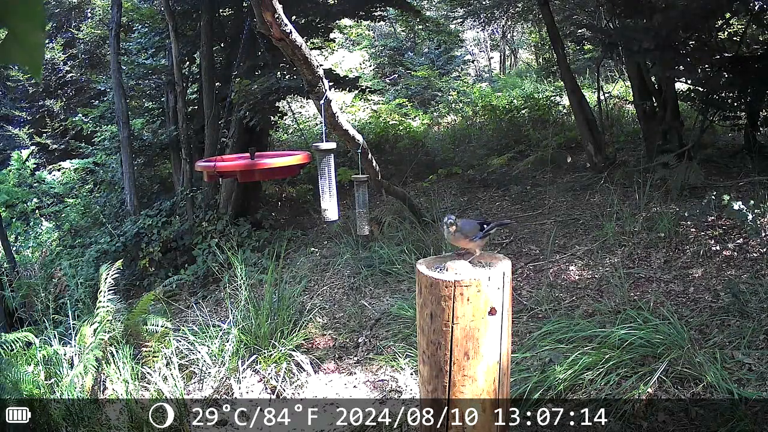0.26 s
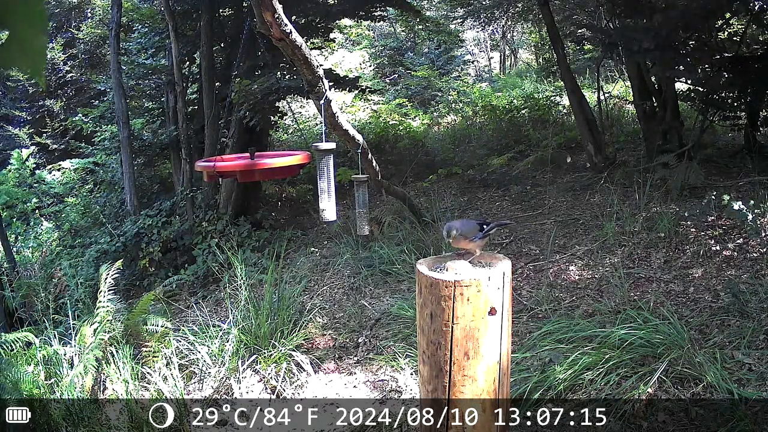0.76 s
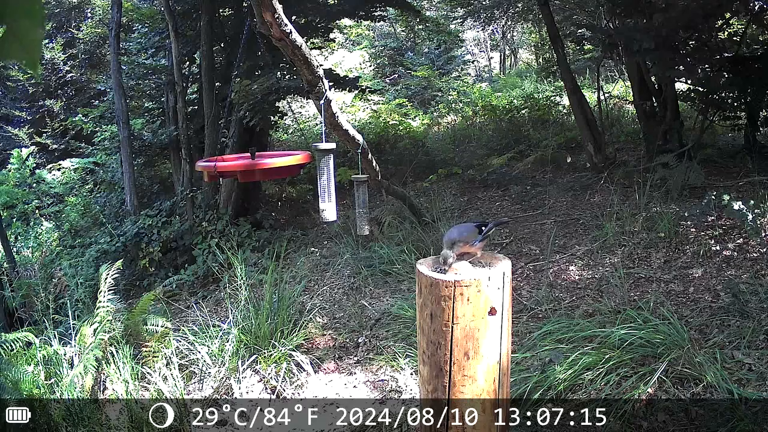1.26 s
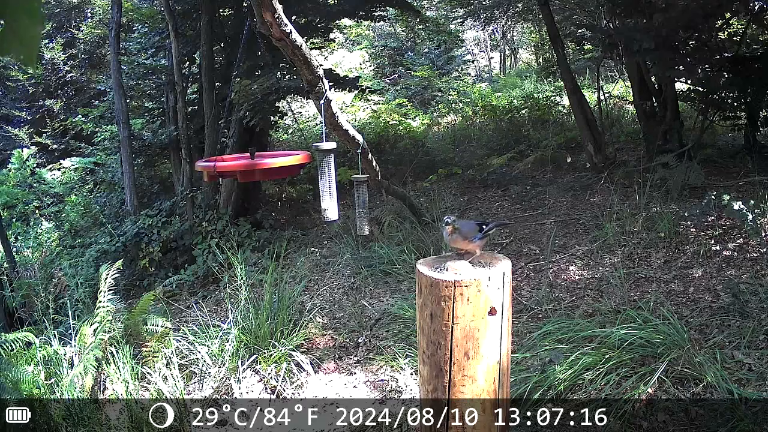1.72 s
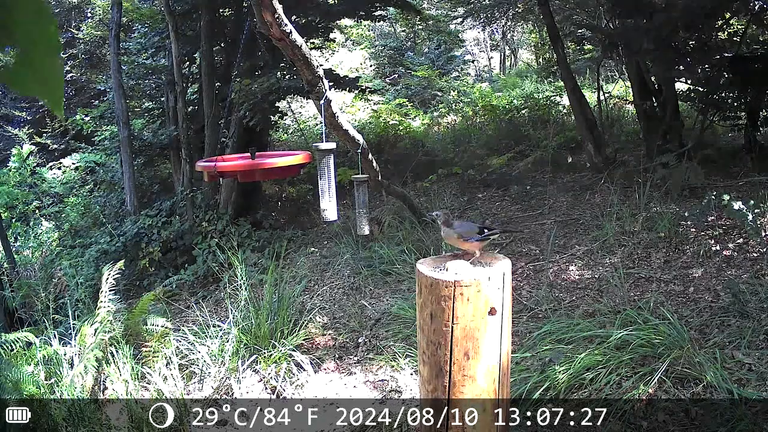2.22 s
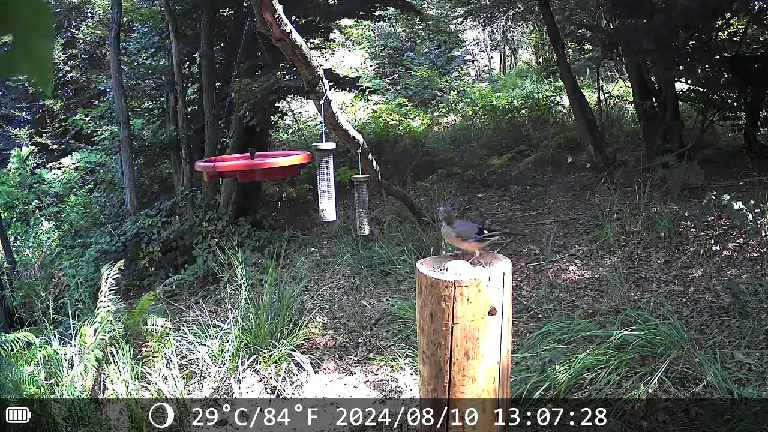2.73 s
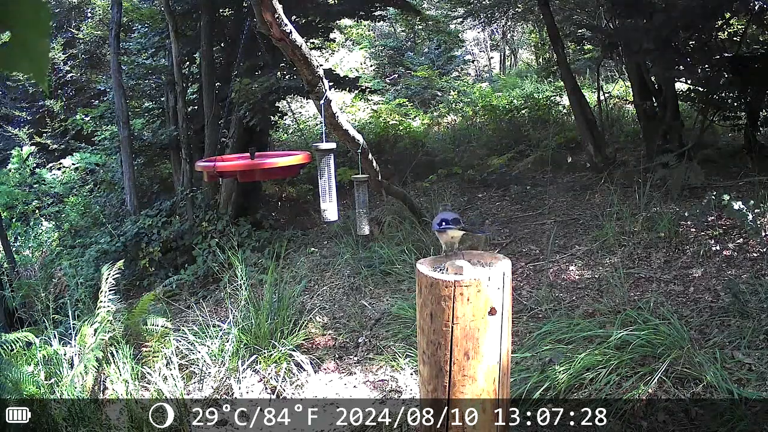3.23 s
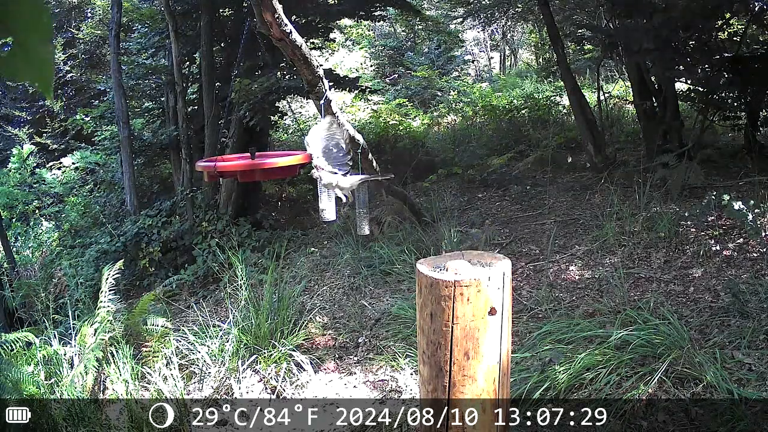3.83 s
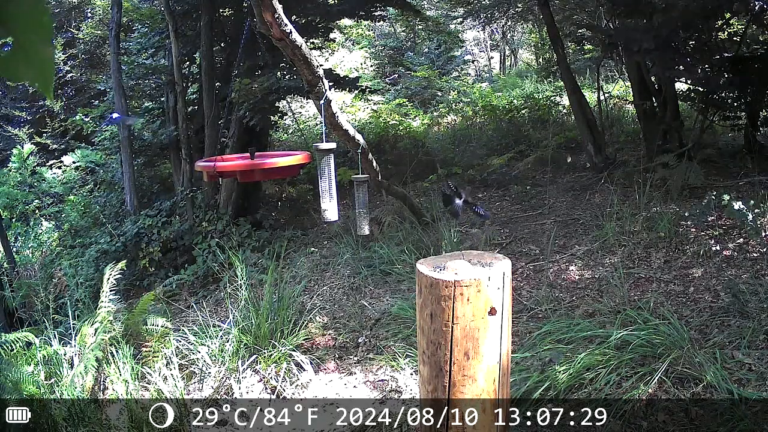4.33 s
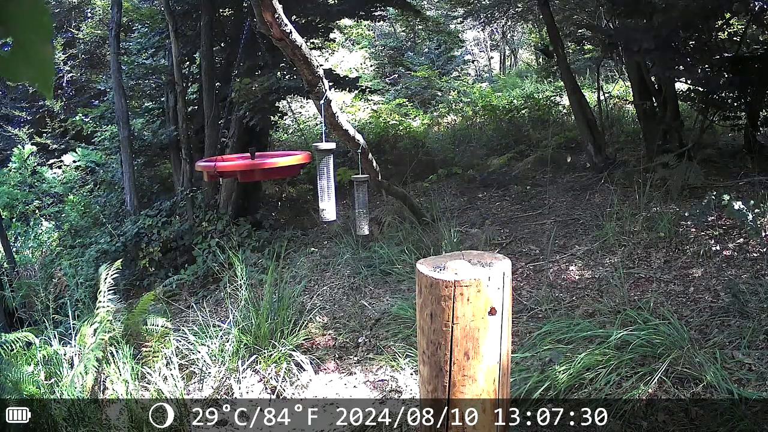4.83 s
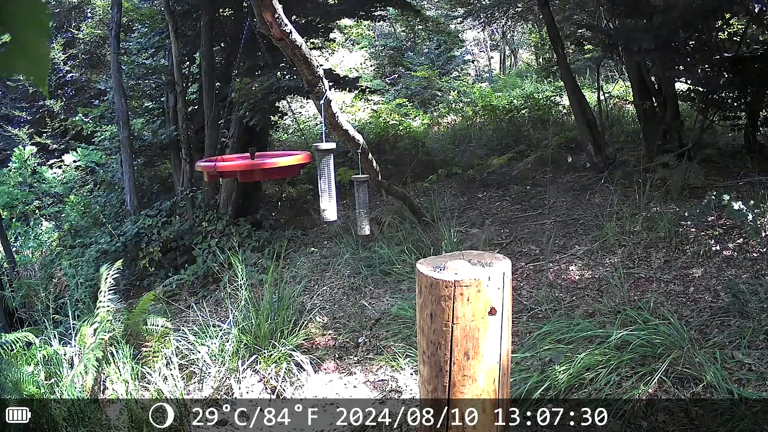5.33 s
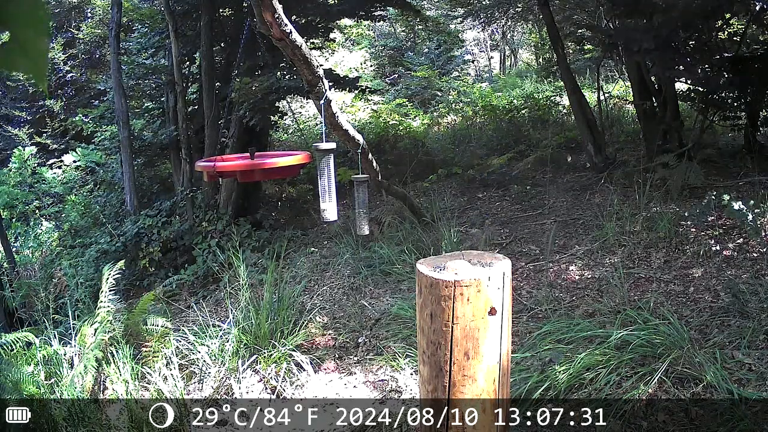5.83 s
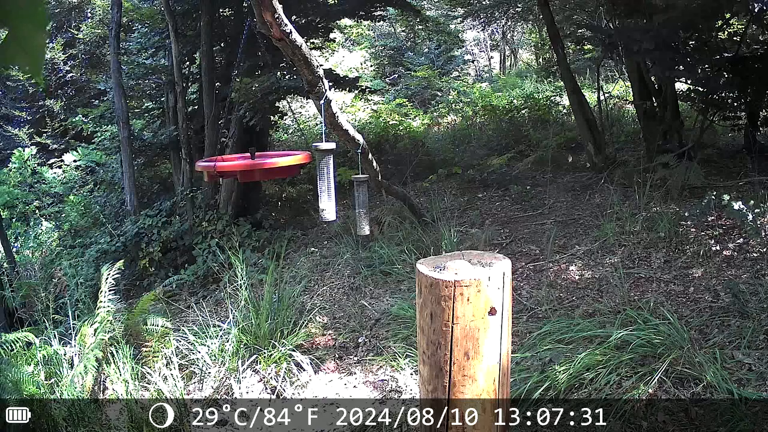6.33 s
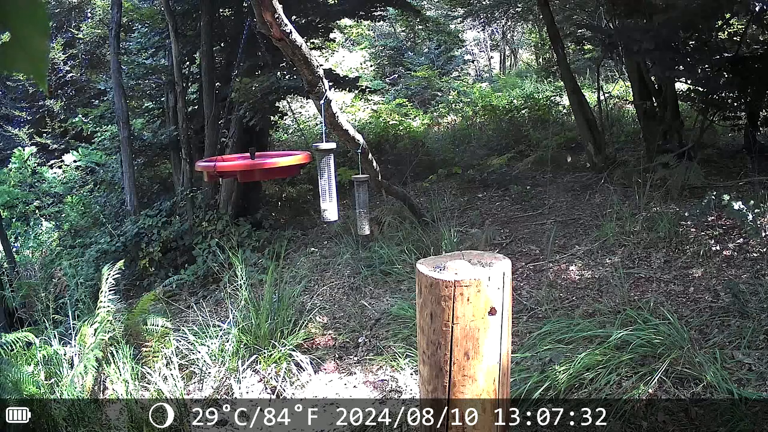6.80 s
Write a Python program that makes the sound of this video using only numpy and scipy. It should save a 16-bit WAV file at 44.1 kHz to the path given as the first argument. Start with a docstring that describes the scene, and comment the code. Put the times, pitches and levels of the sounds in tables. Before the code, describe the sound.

Fast insect pulses and a distant insect chorus run throughout, with quiet moving air and leaves. After a very thin chirp and a small grainy rustle with ticks, a jay close to the fixed microphone gives coarse, noisy screams; low fluttering wingbeats overlap them. One trill stops soon after, leaving a thinner insect bed, a last separate screech, and soft echoing whistles from a small bird deep in the wood.

```python
"""Jay in a summer wood

A jay screeches five times, chopped noisy partials from a chaotic syrinx, then flaps off: thumps and puffs.
Crickets and bush crickets repeat pulsed tones, two in bouts; gliding sines make bird whistles and a thin chirp.
Shaped noise makes the far insects, leaves, moving air, rumble and microphone hiss."""
import sys
import numpy as np
from scipy import signal
from scipy.fft import rfft, irfft, next_fast_len
from scipy.io import wavfile
from scipy.ndimage import uniform_filter1d, map_coordinates

SR = 44100
rng = np.random.default_rng(int(sys.argv[2]) if len(sys.argv) > 2 else 0)


def pcm_store(signal):
    """Save signal as 16-bit PCM."""
    levels = np.round(np.clip(np.atleast_2d(signal), -1, 1) * 32767)
    wavfile.write(sys.argv[1], SR, levels.astype(np.int16).T)


N = 311346


def amp(db):
    """Amplitude ratio of a level in dB."""
    return 10 ** (np.asarray(db) / 20)


def unit(x):
    """x scaled to rms 1."""
    return x / np.sqrt(np.mean(x ** 2) + 1e-20)


def curves(rows):
    """Per-sample line through each column after the time column."""
    s, *cols = np.transpose(rows)
    return [np.interp(np.arange(N) / SR, s, c) for c in cols]


def wobble(knots_per_s):
    """Smooth random curve through normal knots."""
    knots = rng.standard_normal(int(N * knots_per_s / SR) + 4)
    return map_coordinates(knots, [np.arange(N) * knots_per_s / SR])


def filtered(x, response):
    """x times a response of frequency in Hz."""
    m = next_fast_len(N + SR)
    spectrum = rfft(x, m) * response(np.fft.rfftfreq(m, 1 / SR))
    return irfft(spectrum, m)[..., :N]


def coloured(x, points):
    """x through (freq_hz, gain_db) points joined on a log frequency axis."""
    f, db = np.transpose(points)
    return filtered(x, lambda hz: amp(np.interp(np.log(hz + 1), np.log(f + 1), db)))


def rush(spectrum, side_db, patchy_db):
    """Stereo noise of rms 1; smoothed random gains make time-frequency patches."""
    z = signal.stft(rng.standard_normal((2, N)), nperseg=512)[2]
    field = uniform_filter1d(rng.standard_normal(z.shape[1:]), 6, 0)
    field = uniform_filter1d(field, 10, 1)
    patchy = signal.istft(z * amp(patchy_db * unit(field)), nperseg=512)[1][:, :N]
    mid, side = coloured(patchy, spectrum)
    side = amp(side_db) * side
    return unit(np.array([mid + side, mid - side]))


def wood(x, t60, wet_db, channels):
    """Direct sound plus the trunks' scattered answer: decaying noise."""
    t = np.arange(SR) / SR
    tail = rng.standard_normal((channels, SR)) * amp(-60 * t / t60) * (t > .004)
    wet = signal.fftconvolve(x[None], tail / np.linalg.norm(tail[0]), axes=1)[:, :N]
    return x + amp(wet_db) * wet


def tone(hz):
    """Sine of rms 1 that follows hz."""
    return np.sqrt(2) * np.sin(2 * np.pi * np.cumsum(hz) / SR)


def bouts(spans, fade_s):
    """Gain 1 inside the spans, 0 outside, with linear fades."""
    t = np.arange(N) / SR
    return sum(np.clip(np.minimum(t - a, b - t) / fade_s + .5, 0, 1) for a, b in spans)


# beak and throat response: freq_hz, gain_db
BEAK_RESPONSE = [(900, -18), (1200, 1.5), (2000, 1), (4500, 1.5), (5300, 1), (6200, -2.5), (7500, -39)]
# vocal effort, one list per call: time_s, level_db
CALL_EFFORT = [
    [(3.48, -54), (3.502, -54), (3.548, -39), (3.806, -29.5), (3.822, -41), (3.9, -47.5)],
    [(3.9, -46.5), (3.984, -33.5), (4.0, -36.5), (4.032, -34), (4.112, -34), (4.2, -62)],
    [(4.23, -59), (4.274, -43.5), (4.316, -38.5), (4.416, -37.5), (4.462, -33.5), (4.56, -69)],
    [(4.62, -64), (4.668, -43.5), (4.702, -40), (4.832, -41.5), (4.94, -67)],
    [(5.31, -69), (5.352, -48.5), (5.424, -40), (5.44, -45.5), (5.534, -42), (5.552, -39.5), (5.66, -68.5)],
]
# call partials, one row per call; levels over effort: low_hz, main_start_hz, main_end_hz, upper_start_hz,
# upper_settled_hz, low_db, gape_db, bridge_db, upper_db, line_clearness (1 = usual)
CALL_VOICES = [(1462, 3040, 3080, 4600, 4080, -21, -21, -7, -3.5, 0.58),
               (1544, 2900, 3060, 4300, 4050, -18, -24, -12, -4.5, 0.54),
               (1518, 2850, 2950, 4280, 4180, -18.5, -23.5, -6.5, -1, 0.54),
               (1453, 2760, 3140, 4080, 4270, -14, -21, -12.5, -4, 1.54),
               (1379, 2990, 3200, 4040, 4180, -16, -20.5, -10.5, -1, 0.86)]
# noise width of each band, low to top: width_hz
BAND_WIDTHS = [200, 290, 513, 422, 377, 460, 320, 1000]
OPENS_BEFORE_END_S, OPENS_IN_S = 0.18, 0.12  # beak opens wider near the end
CLOSES_IN_S, OPEN_AT_START_SHARE = .06, 0.6  # beak starts part open
UNDER_OPENS_DB, GAPE_OPENS_DB, BRIDGE_OPENS_DB, UPPER_OPENS_DB = 15.5, 11.5, 3.5, 2
LOW_QUITS_S, LOW_QUITS_DB = 0.11, -28.5  # low partial dies first
LOW_LAG_DB_PER_DB = 0.17  # low partial follows effort less
LOW_BEND_SHARE, LOW_BEND_KNOTS_PER_S = .03, 12
SPRAY_DB, SPRAY_DB_PER_DB, LOUD_DB = -11.5, 0.63, -27.5  # top band follows effort more, around LOUD_DB
UNDER_DB, OVER_DB = -18, -9.5  # faint partials, relative to low and upper
UPPER_SETTLES_S = .11  # upper partial's glide
WANDER_DB, WANDER_KNOTS_PER_S = 2.3, 35  # independent level of each band


def jay():
    """Chaotic syrinx: wavering partials share one slower rasp; beak opening lifts some."""
    t, rows = np.arange(N) / SR, []
    on, rasp_hz, opening, quitting = np.zeros((4, N))
    for call, voice in zip(CALL_EFFORT, CALL_VOICES):
        low, main_a, main_b, upper_a, upper_b, *rest = voice
        start, end = call[0][0], call[-1][0]
        inside = (t > start) * (t <= end)
        on += np.clip(np.minimum(t - start, end - t) / 0.025, 0, 1)
        rasp_hz += inside * np.interp(t, [start, end], [192, 160])
        opening += inside * np.clip((t - end + OPENS_BEFORE_END_S) / OPENS_IN_S, 0, 1)
        opening += inside * OPEN_AT_START_SHARE * np.clip(1 - (t - start) / CLOSES_IN_S, 0, 1)
        quitting += inside * np.clip(1 - (end - t) / LOW_QUITS_S, 0, 1)
        main_settled = main_a + (main_b - main_a) * UPPER_SETTLES_S / (end - start)
        rows += [(start, low, main_a, upper_a, *rest),
                 (start + UPPER_SETTLES_S, low, main_settled, upper_b, *rest),
                 (end - 1 / SR, low, main_b, upper_b, *rest)]
    effort_db = curves(np.concatenate(CALL_EFFORT))[0]
    low, main, upper, low_db, gape_db, bridge_db, upper_db, clearness = curves(rows)
    low = low * (1 + LOW_BEND_SHARE * wobble(LOW_BEND_KNOTS_PER_S))
    # bands: under, low, gape, main, bridge, upper, over, spray
    centres = [low - 380, low, (low + main) / 2, main, (main + upper) / 2, upper, upper + 700, upper + 1100]
    clear = np.outer([.4, .55, .45, .4, .3, .4, .3, .05], np.clip(clearness, 0, 1.7))
    low_db += LOW_QUITS_DB * quitting - LOW_LAG_DB_PER_DB * (effort_db - effort_db.max())
    levels_db = [low_db + UNDER_DB + UNDER_OPENS_DB * opening,
                 low_db,
                 gape_db + GAPE_OPENS_DB * opening,
                 -4.5,
                 bridge_db + BRIDGE_OPENS_DB * opening,
                 upper_db + UPPER_OPENS_DB * opening,
                 upper_db + OVER_DB,
                 SPRAY_DB + SPRAY_DB_PER_DB * (effort_db - LOUD_DB)]
    source = np.zeros(N)
    for hz, width_hz, line_share, db in zip(centres, BAND_WIDTHS, clear, levels_db):
        gain = amp(db + WANDER_DB * wobble(WANDER_KNOTS_PER_S))
        source += gain * flutter(hz, width_hz, line_share)
    # uneven pace; every second burst weaker
    beat = 2 * np.pi * np.cumsum(rasp_hz * (1 + 0.0777 * wobble(60))) / SR
    chop = unit(amp(3.3 * np.cos(beat) + .8 * np.cos(beat / 2) + .9 * wobble(160)))
    voice = on * amp(effort_db) * chop * source
    return wood(coloured(voice, BEAK_RESPONSE), t60=0.28, wet_db=-6, channels=1)


def flutter(hz, width_hz, clear):
    """Partial that follows hz: a wavering line inside a cloud of noise."""
    noise = filtered(rng.standard_normal((2, N)), lambda f: np.exp(-(f / width_hz) ** 2))
    wavering_hz = hz * (1 + .015 * wobble(55) + .013 * wobble(14))  # quick waver, slow drift
    turn = 2 * np.pi * np.cumsum(wavering_hz) / SR
    cloud = unit(noise[0] * np.cos(turn) + noise[1] * np.sin(turn))
    return np.sqrt(2 * clear) * np.cos(turn) + np.sqrt(1 - clear) * cloud


# wing downstrokes: start_s, thump_db, thump_hz, puff_db
WING_STROKES = [(3.95, -56, 425, -56.5), (3.98, -45, 467, -41), (4.076, -49, 427, -52.5),
                (4.123, -57, 708, -58), (4.165, -46.5, 444, -54), (4.254, -58.5, 357, -59),
                (4.342, -58, 414, -61.5), (4.432, -63, 607, -63)]
# puff noise colour: freq_hz, gain_db
PUFF_SPECTRUM = [(120, -16), (250, -1), (450, 0), (700, -2.5), (1200, -12), (3000, -9), (7000, -62.5)]
STROKE_RISE_S = 0.0067


def wings():
    """Each downstroke is a low thump and a puff of air with a feather-rustle tail."""
    puffs, thumps = np.zeros(N + SR), np.zeros(N + SR)
    t = np.arange(SR // 4) / SR
    swell = (t / STROKE_RISE_S * np.exp(1 - t / STROKE_RISE_S)) ** 2
    for s, db, hz, puff_db in WING_STROKES:
        span = slice(round(s * SR), round(s * SR) + len(t))
        puffs[span] += amp(puff_db) * (swell + 0.45 * np.exp(-t / 0.062))
        thumps[span] += amp(db) * swell * np.sin(2 * np.pi * hz * t)
    air = unit(coloured(rng.standard_normal(N), PUFF_SPECTRUM))
    return thumps[:N] + puffs[:N] * air


# thin near chirp: time_s, pitch_hz, level_db
NEAR_CHIRP = [(2.055, 7460, -74), (2.07, 7700, -63), (2.1, 8250, -61), (2.112, 8650, -60),
              (2.123, 8840, -62), (2.133, 8500, -59), (2.143, 8340, -63), (2.155, 7300, -58)]


def birds():
    """Small birds slightly left; the far whistler echoes longer."""
    far = wood(whistles(), t60=1.3, wet_db=-6.5, channels=2)
    chirp = sing(*curves(NEAR_CHIRP), NEAR_CHIRP[0][0], NEAR_CHIRP[-1][0])
    near = wood(chirp, t60=.25, wet_db=-18, channels=2)
    return amp([[1.2], [-1.2]]) * (far + near)


# far whistles: start_s, length_s, first_hz, last_hz, crest_share, crest_db
FAR_WHISTLES = [(5.464, 0.19, 2020, 2437, 1, -58.5), (5.706, 0.04, 1836, 2030, .6, -65.5),
                (5.852, 0.205, 1980, 2437, .48, -55.5)]
GLIDE_S, FADE_IN_DB, FADE_OUT_DB = .08, -19.5, -5.5  # edge levels relative to crest


def whistles():
    """Rising whistles that level off in pitch, swell, fade and stop short."""
    song, t = np.zeros(N), np.arange(N) / SR
    for s, length, first_hz, last_hz, crest, db in FAR_WHISTLES:
        age = np.clip(t - s, 0, length)
        rise = np.tanh(age / GLIDE_S) / np.tanh(length / GLIDE_S)
        level_db = db + np.interp(age / length, [0, crest, 1], [FADE_IN_DB, 0, FADE_OUT_DB])
        song += sing(first_hz + (last_hz - first_hz) * rise, level_db, s, s + length)
    return song


def sing(hz, db, start, end):
    """Gliding sine of unsteady level with soft edges."""
    t = np.arange(N) / SR
    edges = np.clip(np.minimum(t - start, end - t) / .006, 0, 1)
    return edges * amp(db + 2.5 * wobble(60)) * tone(uniform_filter1d(hz, size=300))


# insect strokes: cycle_share, pitch_hz, level_db
TICK_STROKE = [(0, 6760, -72.5), (.04, 6860, -59.5), (.12, 6870, -65.5), (.24, 6810, -71.5),
               (.32, 6620, -95.5), (.6, 6297, -100), (.68, 6773, -68.5), (.9, 6884, -70), (.95, 6816, -80)]
ARCH_STROKE = [(0, 5840, -68), (.05, 5680, -72), (.1, 5500, -73), (.15, 5380, -78), (.18, 5350, -95),
               (.78, 5680, -95), (.84, 5750, -73), (.92, 5860, -67)]
TRILL_STROKE = [(0, 7820, -73.5), (.12, 7720, -78), (.2, 7680, -82.5), (.72, 7660, -83.5), (.82, 7740, -78)]
LISP_STROKE = [(0, 12200, -83), (0.12, 12200, -107), (0.349, 12250, -97.5), (.45, 12250, -110),
               (.8, 12300, -110), (0.881, 12200, -93)]
# singing spans: start_s, end_s
TRILL_SPANS = [(-1, 4.19)]
LISP_SPANS = [(.83, 2.8), (4.68, 5.8)]
# faint steady buzz: freq_hz, relative_db_per_hz
BUZZ_SPECTRUM = [(2450, -50.5), (2620, -0.5), (2720, 3.5), (2850, -22.5), (3000, -46)]
# far insects: freq_hz, relative_db_per_hz
CHORUS_SPECTRUM = [(2060, -51.5), (3500, -25.5), (3940, -8.5), (4260, -10), (4540, -6), (4850, -4),
                   (5390, -12), (5660, -8), (6200, -3), (6700, -2), (7090, -10), (7240, -6.5),
                   (8100, -28.5), (10500, -57), (17800, -120)]


def insects():
    """Five near singers and a faint buzz over a far chorus that melts into hiss."""
    tick = singer(11.94, .79, TICK_STROKE, overtone_db=-41, vary_db=-1.0, blur=0.00302, wet_db=-9.0)
    arch = singer(11.78, .95, ARCH_STROKE, overtone_db=-22, vary_db=1.5, blur=.002, wet_db=-9)
    trill = singer(43.46, .15, TRILL_STROKE, overtone_db=-76.5, vary_db=-1.5, blur=0.0034, wet_db=-10.0)
    lisp = singer(12.18, 0, LISP_STROKE, overtone_db=-90, vary_db=2.5, blur=0.01, wet_db=-4.0)
    trill = bouts(TRILL_SPANS, fade_s=0.036) * trill
    lisp = bouts(LISP_SPANS, fade_s=.1) * lisp
    buzz = amp(-86.5) * rush(BUZZ_SPECTRUM, side_db=-6.5, patchy_db=4.5)
    chorus = amp(-64.5) * rush(CHORUS_SPECTRUM, side_db=-10.5, patchy_db=1.5)
    return tick + arch + trill + lisp + buzz + field_cricket() + chorus


def singer(strokes_per_s, first_share, stroke, overtone_db, vary_db, blur, wet_db):
    """An insect repeats one wing stroke; pitch and level vary randomly."""
    place = first_share + strokes_per_s * np.arange(N) / SR
    share, hz, db = np.transpose(stroke)
    hz = np.interp(place, share, hz, period=1) * (1 + blur * wobble(400))
    db = np.interp(place, share, db, period=1) + vary_db * wobble(30)
    song = amp(db) * (tone(hz) + amp(overtone_db) * tone(2 * hz))
    return wood(song, t60=0.33, wet_db=wet_db, channels=2)


# field cricket chirps: start_s, length_s
CRICKET_CHIRPS = [(-.05, 0.21), (0.537, 0.24), (1.72, 0.24), (2.294, 0.28), (2.886, 0.25), (4.15, 0.13),
                  (4.82, 0.14), (5.501, 0.21), (6.173, 0.27), (6.845, 0.26)]


def field_cricket():
    """Chirps of about 31 syllables per s, each bending upward in pitch."""
    t, level = np.arange(N) / SR, np.zeros(N)
    for s, length in CRICKET_CHIRPS:
        arc = np.sin(np.pi * np.clip((t - s) / length, 0, 1))
        level += amp(-65.5) * np.sqrt(np.abs(arc))
    syllable = (31 * t + 0.44 * wobble(5.3)) % 1
    hz = 4350 + 170 * syllable + 75 * wobble(250)
    pulse = 0.59 + 0.44 * np.sin(np.pi * syllable)
    song = level * pulse * amp(2.1 * wobble(120)) * tone(hz)
    return wood(song, t60=0.75, wet_db=-1.0, channels=2)


# background noise spectra: freq_hz, relative_db_per_hz
LEAF_SPECTRUM = [(290, -40.5), (500, -5.5), (1770, -11.5), (2080, -13.5), (2250, -15.5), (2380, -11.5),
                 (4200, -14.5), (5460, -46.5), (9240, -120)]
AIR_SPECTRUM = [(71, -28), (120, -1.5), (470, -8.5), (512, -15), (591, -9), (643, -14), (2670, -27),
                (3600, -33.5), (4680, -71.5), (7920, -120)]
RUMBLE_SPECTRUM = [(13, -41.5), (22, -9), (46, 2.5), (59, -1), (75, -13.5), (86, -1), (102, -6),
                   (150, -15.5), (200, -45.5), (330, -120)]
MIC_HISS_SPECTRUM = [(4650, -36), (7900, -6.5), (8360, -10.5), (9700, -6.5), (10600, -11.5), (11900, -6),
                     (15500, -15.5)]
LEAF_DB = -71
HUSH_FROM_S, HUSH_TO_S, HUSH_DB = 1.718, 2.436, -9.5  # leaf hiss drops abruptly, then returns


def background():
    """Shaped noise: leaves, moving air, far rumble and microphone hiss, plus a rustle."""
    leaf_db = LEAF_DB + HUSH_DB * bouts([(HUSH_FROM_S, HUSH_TO_S)], fade_s=.004)
    leaves = amp(leaf_db + 0.33 * wobble(27)) * rush(LEAF_SPECTRUM, side_db=-11, patchy_db=1.7)
    air = amp(-68.5) * rush(AIR_SPECTRUM, side_db=-4.5, patchy_db=-0.1)
    rumble = amp(-66 + 0.46 * wobble(7.6)) * rush(RUMBLE_SPECTRUM, side_db=-9.5, patchy_db=0.76)
    rumble = amp([[.7], [-.7]]) * rumble  # slightly left
    mic_hiss = amp(-80.5) * rush(MIC_HISS_SPECTRUM, side_db=-3.5, patchy_db=-1.5)
    return leaves + rustle() + air + rumble + mic_hiss


# rustle noise colour: freq_hz, relative_db_per_hz
RUSTLE_SPECTRUM = [(1200, -26), (1900, -5.5), (2500, -2.5), (4000, 1), (6000, -7.5), (8000, -27)]
# ringing ticks: time_s, peak_db, pitch_hz
RUSTLE_TICKS = [(2.437, -63.5, 2000), (2.693, -60, 2550)]
RUSTLE_DB, RUSTLE_DECAY_S, TICK_T60_S = -64.5, 0.43, 0.069


def rustle():
    """Grainy noise dies away as the leaf hiss returns, with short ringing ticks."""
    t = np.arange(N) / SR
    since = t - HUSH_TO_S
    grains = unit(coloured(amp(2.5 * wobble(200)) * rng.standard_normal(N), RUSTLE_SPECTRUM))
    ticks = np.zeros(N)
    for s, db, hz in RUSTLE_TICKS:
        ring = amp(db - 60 * np.abs(t - s) / TICK_T60_S)
        ticks += (t > s) * ring * np.sin(2 * np.pi * hz * t)
    decay = (since > 0) * np.exp(-np.abs(since) / RUSTLE_DECAY_S)
    return amp(RUSTLE_DB) * decay * grains + ticks


def scene():
    """Sum of all sources, in stereo."""
    return jay() + wings() + birds() + insects() + background()


def record(dry):
    """Band limit: nothing from 15620 Hz up is kept."""
    return filtered(dry, lambda hz: hz < 15620)


dry = scene()
out = record(dry)
pcm_store(out)
```